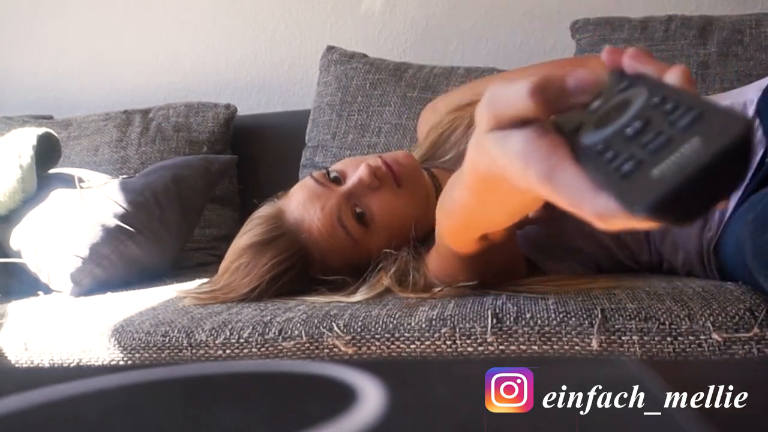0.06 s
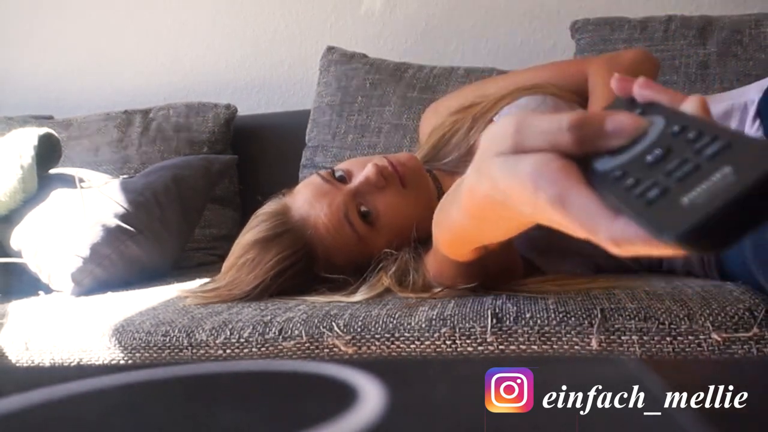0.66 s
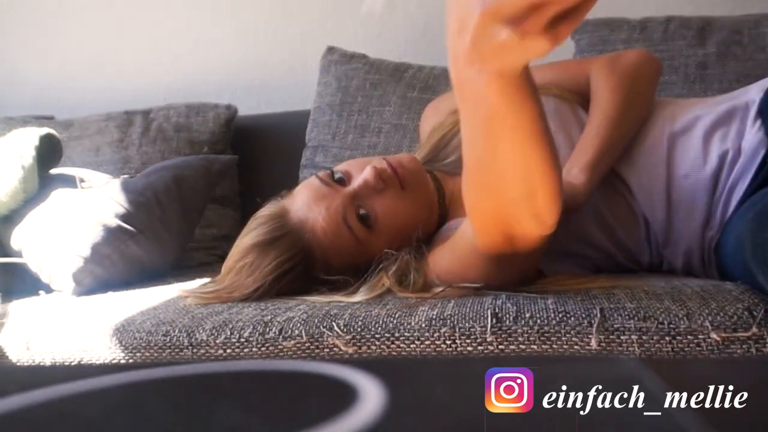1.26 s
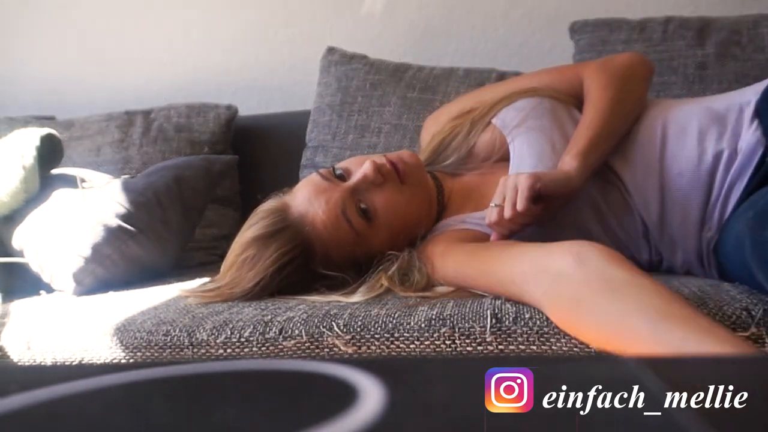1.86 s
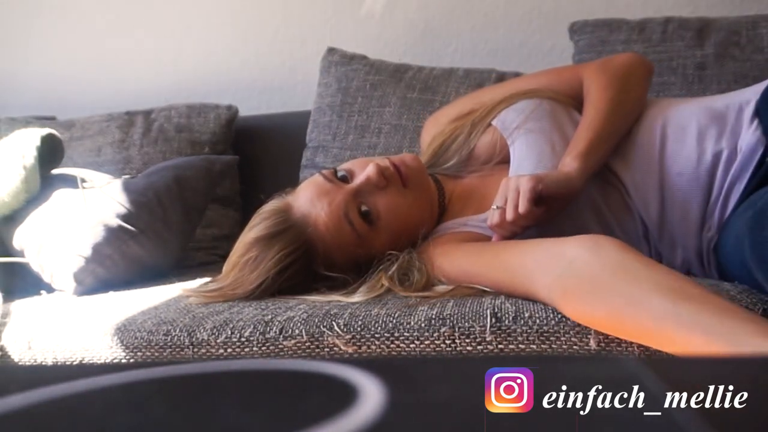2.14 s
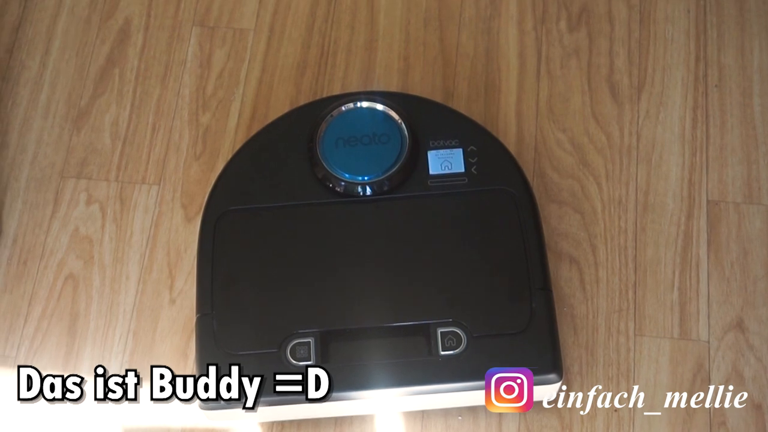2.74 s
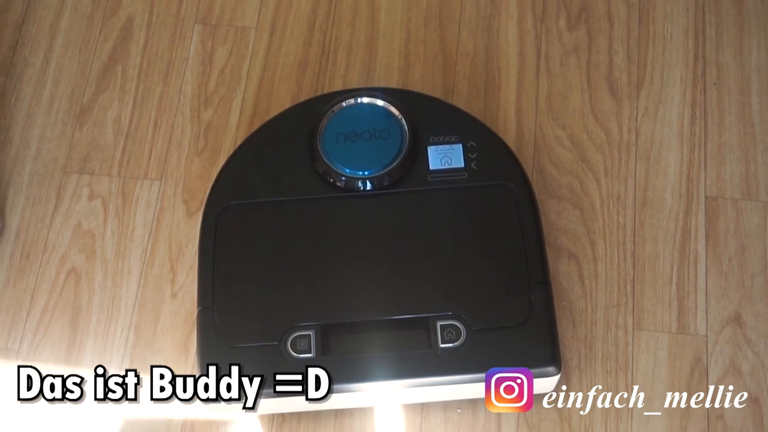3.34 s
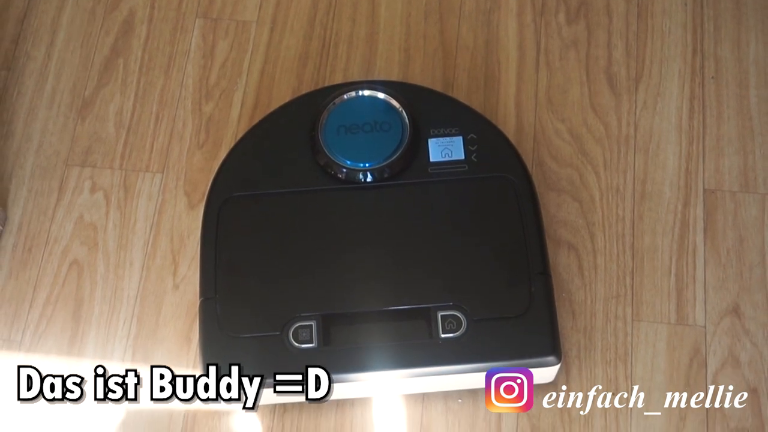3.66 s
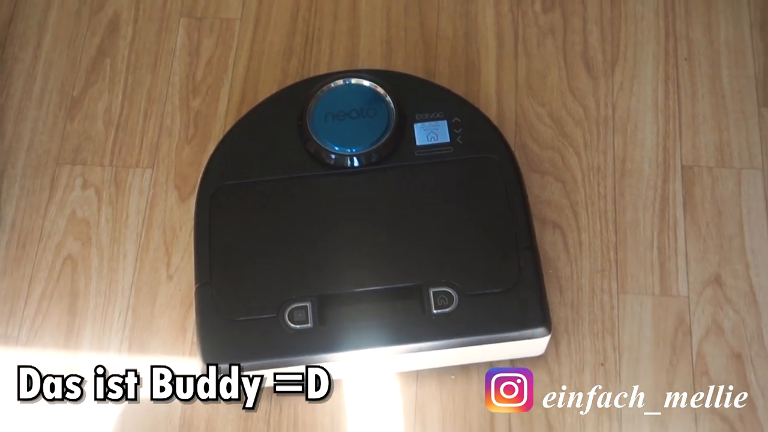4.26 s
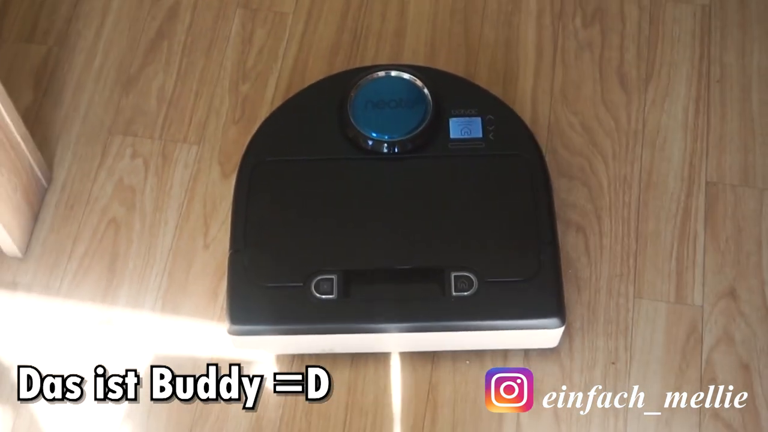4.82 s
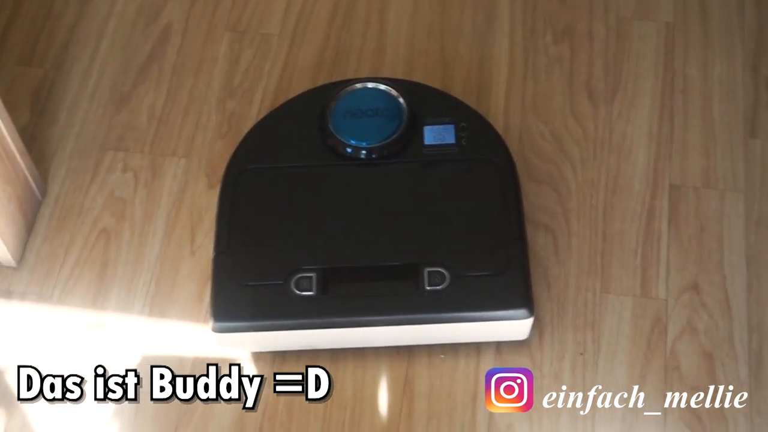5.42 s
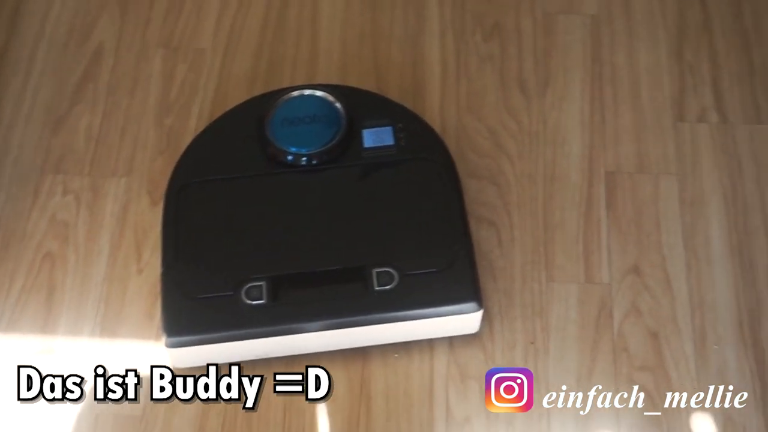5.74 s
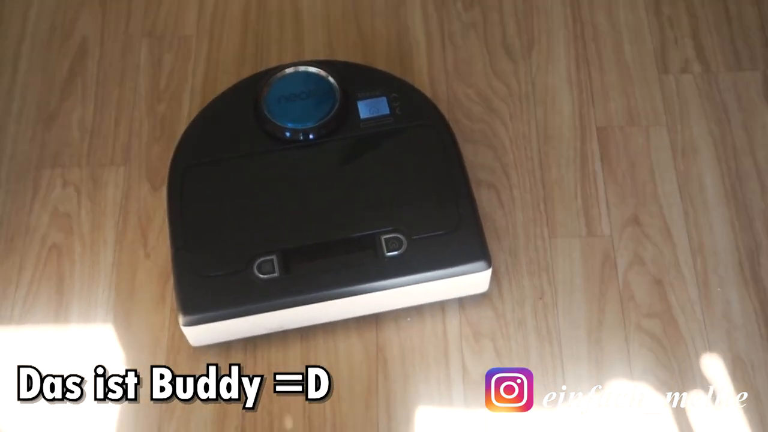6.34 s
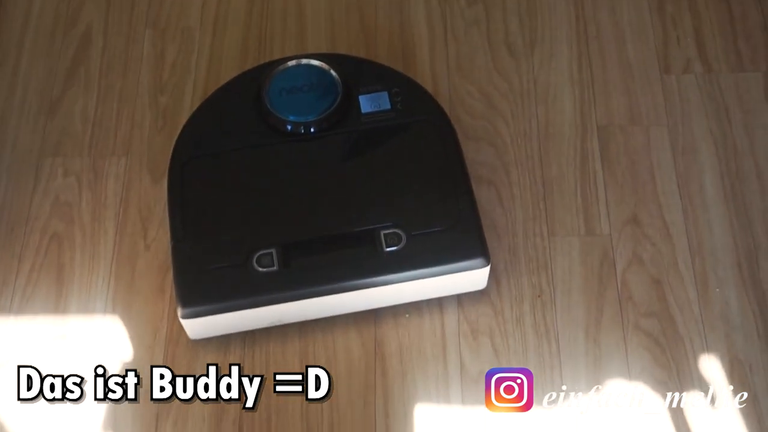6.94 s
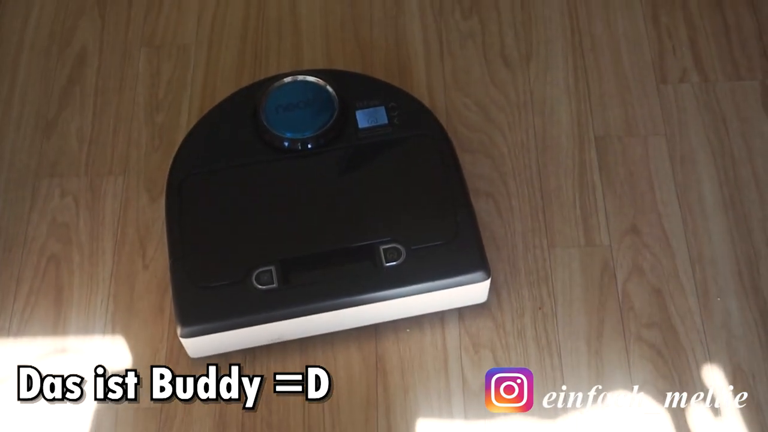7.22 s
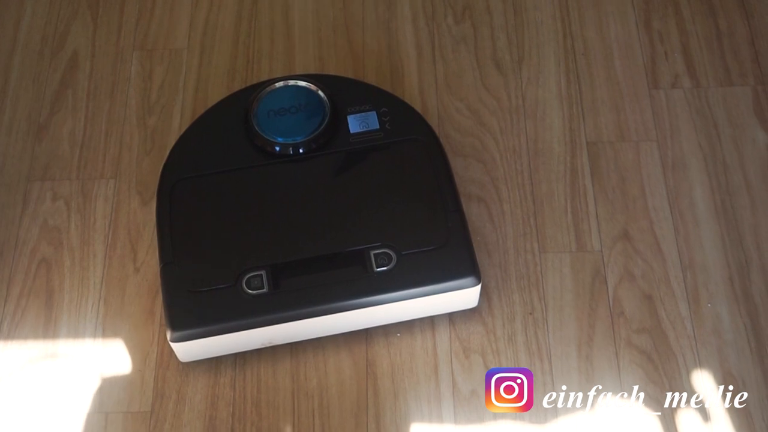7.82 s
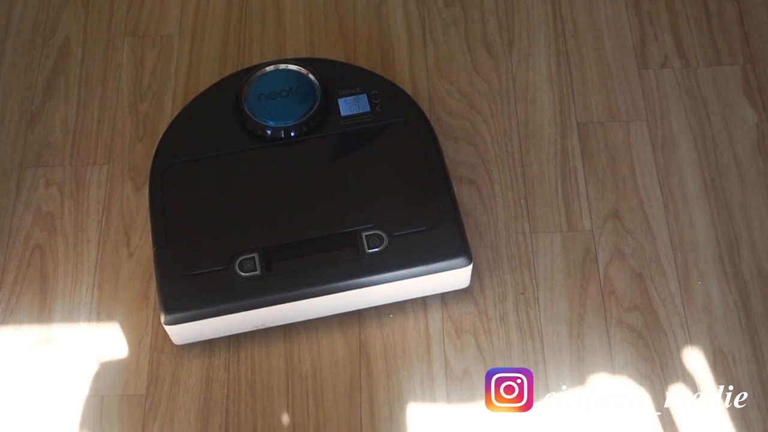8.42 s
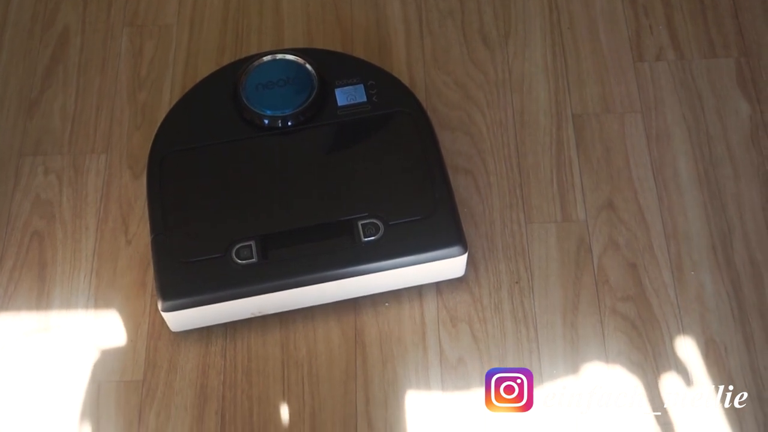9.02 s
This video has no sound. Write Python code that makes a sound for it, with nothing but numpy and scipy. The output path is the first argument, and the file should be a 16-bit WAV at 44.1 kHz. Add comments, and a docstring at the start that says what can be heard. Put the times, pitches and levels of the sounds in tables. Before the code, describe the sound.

Faint plastic clicks and a cloth swish give way suddenly to a robot vacuum's steady fan hum, brush noise and hissing air.

```python
"""First come a few small clicks in a quiet living room, and a short swish, as someone on a sofa handles
a remote control. Then, all at once, a robot vacuum is running close by on a laminate floor.
Its spinning fan hums, its brush scrubs and shakes the housing, and air hisses out of its exhaust.
Single tones swell and fade as it drives through the room's standing waves (fixed loud and soft spots).
Near the end its motors whine and a faint low rumble grows."""
import sys
import numpy as np
from scipy import signal
from scipy.fft import rfft, irfft, next_fast_len
from scipy.io import wavfile
from scipy.ndimage import map_coordinates

SR = 44100
rng = np.random.default_rng(int(sys.argv[2]) if len(sys.argv) > 2 else 0)


def dump_mix(stems):
    """Bounce the given channels to the path in sys.argv[1] as a 16-bit WAV at rate SR."""
    frames = np.atleast_2d(stems).T  # one column per channel
    limited = np.clip(frames, -1, 1)  # hard clip at full scale
    pcm = np.round(limited * 32767).astype(np.int16)
    wavfile.write(sys.argv[1], SR, pcm)


N = 404838
TIME = np.arange(N) / SR


def amp(db):
    """Turn decibels into a gain."""
    return 10 ** (np.asarray(db) / 20)


def unit(x):
    """Scale a sound to an average power of 1."""
    return x / np.sqrt(np.mean(x ** 2) + 1e-20)


def along(points, hz):
    """Read between the rows of a (frequency, value) table, on a pitch scale."""
    f, values = np.transpose(points)
    return np.interp(np.log(hz + 1), np.log(f + 1), values)


def wobble(rate):
    """A smooth curve through `rate` random values a second."""
    return map_coordinates(rng.standard_normal(int(N * rate / SR) + 4), [TIME * rate])


def envelope(start, length, attack, release):
    """Fade in, hold at 1, fade out; all times in seconds."""
    t = TIME - start
    return np.clip(np.minimum(t / attack, (length - t) / release), 0, 1)


def filtered(x, response):
    """Give each frequency the gain response(hz)."""
    size = next_fast_len(N + SR // 2)
    return irfft(rfft(x, size) * response(np.fft.rfftfreq(size, 1 / SR)), size)[..., :N]


def lifts(bumps, x):
    """Add up (centre, width, dB) bumps along frequency or time."""
    return sum(db / (1 + (2 * (x - centre) / width) ** 4) for centre, width, db in bumps)


# How alike the two ears hear a noise: f/Hz, likeness (1 = the same)
EAR_LIKENESS = [(40, .75), (100, 0.99), (250, 1), (480, 0.98), (950, 0.8), (1900, 0.21), (3800, 0.31),
                (7500, 0.45), (15000, .52)]

def noise(colour_db, alike=EAR_LIKENESS):
    """Stereo noise of power 1; its colour says how strong each frequency is."""
    def response(hz):
        spread = np.arccos(np.clip(along(alike, hz), -1, 1)) / 2
        return amp(colour_db(hz)) * [np.cos(spread), np.sin(spread)]

    mid, side = filtered(rng.standard_normal((2, N)), response)
    return unit(np.array([mid + side, mid - side]))


# Colour of the quiet room: f/Hz, level/dB
ROOM_COLOUR = [(25, -17), (60, -14), (130, -7.5), (250, -5), (400, -6.5), (700, -7), (1000, -11),
               (1250, -7.5), (1700, -14.5), (4000, -18), (11500, -22.5), (15000, -20)]

def room_tone(whine_hz=15625):
    """Faint room air and a thin electronic whine."""
    air = noise(lambda hz: along(ROOM_COLOUR, hz), alike=[(100, .37), (1000, .081), (6000, .2)])
    whine = np.sqrt(2) * np.sin(2 * np.pi * whine_hz * TIME)
    return amp(-71) * air + amp([[-73], [-67]]) * whine


# Time the room's echo takes to fall by 60 dB: f/Hz, t/s
ECHO_DECAY = [(200, 0.44), (3000, 0.55), (12000, 0.36)]

def room_echo(x):
    """The walls return a stereo tail in which each frequency dies at its own speed."""
    hz, t, spectrum = signal.stft(rng.standard_normal((2, SR // 2)), SR, nperseg=256)
    decay = amp(-60 * t / along(ECHO_DECAY, hz)[:, None])
    tail = signal.istft(spectrum * decay, SR, nperseg=256)[1]
    tail = np.pad(tail, ((0, 0), (round(.008 * SR), 0)))
    return signal.fftconvolve(x[None], tail / np.linalg.norm(tail[0]), axes=1)[:, :len(x)]


# Clicks of remote and hand: t/s, peak level/dB, brightness/dB per octave, snap f/Hz, echo gain/dB
REMOTE_CLICKS = [(0.405, -60, -4, 2100, -10), (.4479, -57, -9, 900, -10), (1.011, -53, -2, 900, -12),
                 (1.0206, -38, 0.5, 2240, -5), (1.4302, -56.5, 4, 4100, -5), (1.514, -43, 1, 900, -7.5),
                 (1.8325, -41.5, 9, 2500, -5), (1.86, -42.5, 3.5, 3280, -9), (1.9780, -46, 2, 2690, 1)]
# Dull colour of the plastic: f/Hz, level/dB
PLASTIC_COLOUR = [(150, -34), (450, -22), (720, 2.5), (1150, 1), (1750, -9), (2400, -4), (4000, -7),
                  (5000, -16), (8000, -28), (15000, -30)]

def remote_clicks():
    """Each click is a tiny crack of plastic with one broad resonance, answered by the room."""
    out = np.zeros((2, N + SR))
    t = np.arange(SR // 2) / SR
    hz = np.fft.rfftfreq(len(t), 1 / SR)
    octave = np.log2(np.clip(hz, 500, 12000) / 2000)

    def crack(colour_db, decay_s):
        """A burst of coloured noise with energy 1."""
        burst = irfft(rfft(rng.standard_normal(len(t))) * amp(colour_db), len(t))
        burst *= (1 - np.exp(-t / .002)) * amp(-60 * t / decay_s)
        return burst / np.linalg.norm(burst)

    for start, db, bright_db, snap_hz, echo_db in REMOTE_CLICKS:
        colour_db = along(PLASTIC_COLOUR, hz) + bright_db * octave
        direct = crack(colour_db + lifts([(snap_hz, 700, 7)], hz), decay_s=.018)
        # the sofa soaks up the lows, so the walls return a brighter, smeared copy
        scattered = crack(colour_db + 2.3 * octave, decay_s=.04)
        echo = room_echo(scattered) + amp(-8) * np.roll(scattered, round(.011 * SR))
        click = (direct + amp(echo_db) * echo) / np.abs(direct).max()
        out[:, round(start * SR):][:, :len(t)] += amp(db) * click
    return out[:, :N]


# Presses on the cushion: start t/s, length/s, level/dB
PRESSES = [(1.33, .115, -74), (1.82, .16, -79)]
# Colour of their thud: f/Hz, level/dB
THUD_COLOUR = [(50, -20), (110, -2), (270, 2), (400, -8), (800, -35)]

def cushion():
    """The cushion gives way under the arm with soft thuds."""
    press = sum(amp(db) * envelope(start, length, .04, .04) for start, length, db in PRESSES)
    return press * noise(lambda hz: along(THUD_COLOUR, hz))


# Colour of rubbed cloth: f/Hz, level/dB
CLOTH_COLOUR = [(100, -20), (250, -8), (1400, -7), (2500, -2), (4700, -10), (8000, -13), (13500, -10),
                (15500, -8)]

def arm_swish():
    """Skin slides over cloth in one quick, grainy stroke."""
    stroke = envelope(start=1.822, length=.088, attack=.017, release=.05)
    rub = stroke * amp(-55.5 + 1.5 * wobble(300)) * noise(lambda hz: along(CLOTH_COLOUR, hz))
    return rub + amp(-1) * room_echo(rub[0])


def fan_speed(free_hz=137.37, loaded_hz=134.74, load_at_s=2.91, slowest_after_s=1.96, settle_s=1.23):
    """Turns per second: load slows the fan, and its speed control overshoots, then settles."""
    t = np.maximum(TIME - load_at_s, 0)
    w = np.pi / slowest_after_s
    swing = np.exp(-t / settle_s) * (np.cos(w * t) + np.sin(w * t) / (w * settle_s))
    return loaded_hz + (free_hz - loaded_hz) * swing


# Fan tones: multiple of the fan speed, base level/dB, scattered level/dB, left minus right/dB
FAN_TONES = [(2, -50, -74, -0.5), (3, -51, -68, 0), (4, -42, -61, 1), (5, -53, -62, -5),
             (8, -59.5, -60, -2), (9, -55, -64, 3), (11, -55.5, -66, 0), (12, -53.5, -53, -1.5),
             (13, -54, -56, -3.5), (16, -58.5, -58, -3), (39, -58.5, -55, 0)]
# Loud and soft spots the robot crosses: tone's multiple, middle t/s, length/s, level change/dB
TONE_SWELLS = [(2, 3.42, 1.96, 8), (3, 3.4, 0.98, -8), (4, 2.75, 1.74, 5), (4, 3.96, 0.46, -4.5),
               (4, 4.7, 0.72, 3.5), (5, 3.94, .5, -9), (5, 5.2, 1.8, 2.5), (8, 2.84, 0.85, 11.5),
               (8, 3.7, 0.74, 15.5), (8, 4.68, 0.93, 14.5), (9, 2.6, .8, 4), (9, 3.9, .9, -6),
               (9, 5.06, 1.6, 7.5), (11, 7.8, 3.3, 6.5), (12, 2.78, 0.98, 13.5), (12, 3.61, 0.57, 13.5),
               (12, 3.98, 0.12, -7), (12, 4.67, 1.0, 16.5), (12, 6.78, 0.88, 8.5), (12, 9.0, .8, 4.5),
               (13, 3.76, .5, 6), (13, 4.75, 0.59, -8), (13, 7.0, 0.95, 4), (16, 2.78, .7, 9.5),
               (39, 3.83, 0.52, 13.5), (39, 6.7, 0.89, 9)]

def fan():
    """The fan hums at multiples of its speed; each tone swells and sinks in the standing waves."""
    angle = 2 * np.pi * np.cumsum(fan_speed() * (1 + .000498 * wobble(5))) / SR
    out = np.zeros((2, N))
    for multiple, db, scattered_db, left_db in FAN_TONES:
        tone = np.exp(1j * (round(multiple) * angle + rng.uniform(0, 2 * np.pi)))
        swell_db = lifts([swell for k, *swell in TONE_SWELLS if round(k) == round(multiple)], TIME)
        wander_db = .58 * wobble(2.496)
        flutter = 1 + .045 * (wobble(14) + 1j * wobble(14))
        mid = amp(db + swell_db + wander_db) * flutter
        # the scattered part keeps its level but drifts between the ears
        side = amp(scattered_db) * np.exp(1j * (np.pi / 2 + .77 * wobble(1.52)))
        balance = amp([[left_db / 2], [-left_db / 2]])
        out += np.sqrt(2) * balance * (np.array([mid + side, mid - side]) * tone).real
    return out


def reflections(x, depth_db, width_hz, shift_s, size=4096):
    """Room reflections carve fine peaks and dips into a sound; they shift as the robot moves."""
    hz, t, spectrum = signal.stft(x, SR, nperseg=size)
    grid = np.array(np.meshgrid(hz / width_hz, t / shift_s, indexing="ij"))
    patterns = rng.standard_normal((3, size // 2, 32))
    shared, left, right = [map_coordinates(p, grid, mode="mirror") for p in patterns]
    ripple_db = along(depth_db, hz)[:, None] * unit(np.array([shared + left, shared + right]))
    return unit(signal.istft(spectrum * amp(ripple_db), SR, nperseg=size)[1][:, :N])


def build_up(start_s=6.87, rise_s=1.96):
    """Goes from 0 to 1 near the end, as the scrubbing and the rumble grow."""
    return np.clip((TIME - start_s) / rise_s, 0, 1)


# Colour of the brush on the floor: f/Hz, level/dB
BRUSH_COLOUR = [(25, -34), (60, -31), (95, -26.5), (125, -11.5), (220, -8), (300, -7.5), (380, 0.5),
                (560, -4), (850, -2), (1100, -7.5), (1400, -8), (2000, -13.5), (4000, -63)]
# Where the housing rings: f/Hz, width/Hz, boost/dB
HOUSING_RINGS = [(132, 18, 4.5), (192.7, 12, 5.5), (267, 33, 7), (347, 26, 6.5), (405, 22, 4.5),
                 (471, 18, 5), (617, 35, 3.5), (871, 16, 5.5), (980, 31, 6), (1176, 96, 2.5)]

def brush():
    """The roller scrubs the floor and makes the housing ring."""
    roller = noise(lambda hz: along(BRUSH_COLOUR, hz) + lifts(HOUSING_RINGS, hz))
    roller = reflections(roller, depth_db=[(150, 1.2), (900, 2.1)], width_hz=22, shift_s=.499)
    # the housing's low drone stays nearly even; the scrubbing above it grows near the end
    drone = filtered(roller, lambda hz: 1 / (1 + (hz / 560) ** 6))
    scrub = roller - drone
    return amp(-37.5 + .44 * wobble(15)) * drone + amp(-37 + 2.5 * build_up() + .5 * wobble(25)) * scrub


# Colour of the exhaust air: f/Hz, level/dB
AIR_COLOUR = [(500, -50), (1100, -15.5), (1600, -15.5), (2400, -9), (3300, -9), (4100, -10), (5000, -8.5),
              (6000, -11.5), (7000, -15.5), (9000, -17), (12000, -17), (14500, -18), (15700, -22)]
# Where the air duct rings: f/Hz, width/Hz, boost/dB
DUCT_RINGS = [(2160, 340, 2.6), (3325, 390, 3.05), (4740, 380, 2.4), (5120, 410, 1.3), (6170, 430, 3),
              (7510, 490, 2.7), (8700, 250, 3.5), (10150, 860, 1.8), (13400, 500, 1.5), (14050, 350, 3)]
# The whistle fading away: t/s, level/dB (before the left-right balance)
WHISTLE_FADE = [(2.5, -46), (3.9, -46), (4.5, -53), (9.1, -64)]
# Which ear gets more of the exhaust: f/Hz, left minus right/dB
EXHAUST_BALANCE = [(400, .2), (1000, -6), (2400, -0.2), (6000, 1.5), (10000, 2.3), (15000, 2)]

def exhaust(whistle_hz=5280):
    """Air hisses through the duct, with a narrow, breathy whistle on top."""
    hiss = noise(lambda hz: along(AIR_COLOUR, hz) + lifts(DUCT_RINGS, hz))
    hiss = reflections(hiss, depth_db=[(1500, 2.2), (5500, 3.7), (12000, 2.2)], width_hz=26, shift_s=.902)
    whistle = noise(lambda hz: -20 * np.log10(1 + ((hz - whistle_hz) / 110) ** 2))
    whistle = reflections(whistle, depth_db=[(5000, 2.7)], width_hz=20, shift_s=.96)
    whistle_db = np.interp(TIME, *np.transpose(WHISTLE_FADE))
    air = amp(-35 + .28 * wobble(11)) * hiss + amp(whistle_db) * whistle
    return filtered(air, lambda hz: amp(np.outer([.5, -.5], along(EXHAUST_BALANCE, hz))))


# Colour of the low rumble: f/Hz, level/dB
RUMBLE_COLOUR = [(20, -13), (45, -10), (70, -18), (105, -2), (165, 10), (215, -14), (400, -45)]

def low_rumble():
    """A faint low rumble grows near the end."""
    return amp(-56.5) * build_up() ** 2 * noise(lambda hz: along(RUMBLE_COLOUR, hz))


# Whines of the drive motors: start t/s, length/s, starting f/Hz, level/dB
MOTOR_WHINES = [(6.87, 0.95, 994, -51.5), (8.0, 1.4, 638, -48.5)]

def drive_motors(octaves_per_s=.235):
    """The drive motors glide up with an unsteady whine."""
    out = np.zeros(N)
    for start, length, start_hz, db in MOTOR_WHINES:
        hz = start_hz * 2 ** (octaves_per_s * (TIME - start))
        phase = 2 * np.pi * np.cumsum(hz * (1 + .007 * wobble(40))) / SR
        fade = envelope(start, length, attack=.2, release=.2)
        out += fade * amp(db + 2.4 * wobble(16)) * np.sqrt(2) * np.sin(phase)
    return out


def scene(vacuum_at_s=2.489):
    """Small sounds in the quiet room, then suddenly the running vacuum."""
    living_room = room_tone() + remote_clicks() + arm_swish() + cushion()
    running = np.clip((TIME - vacuum_at_s) / .0019, 0, 1)
    return living_room + running * (fan() + brush() + exhaust() + low_rumble() + drive_motors())


def record(dry):
    """Cut away the very highest treble."""
    return filtered(dry, lambda hz: hz < 15740)


dry = scene()
out = record(dry)
dump_mix(out)
```